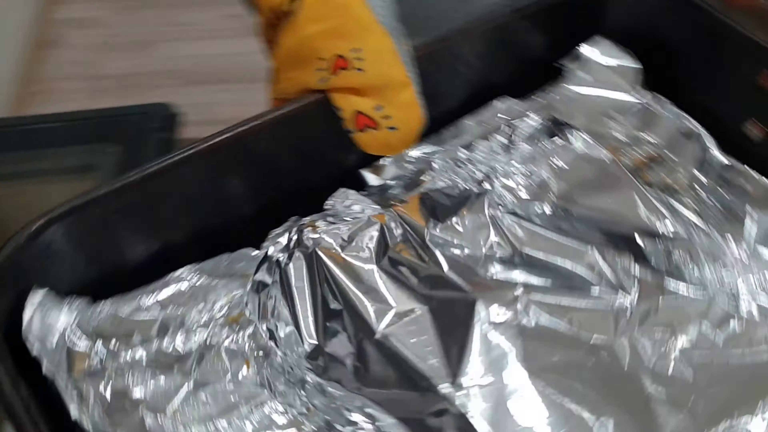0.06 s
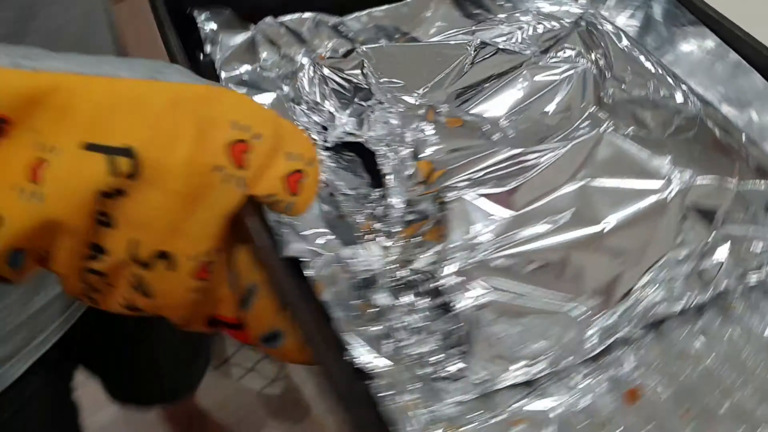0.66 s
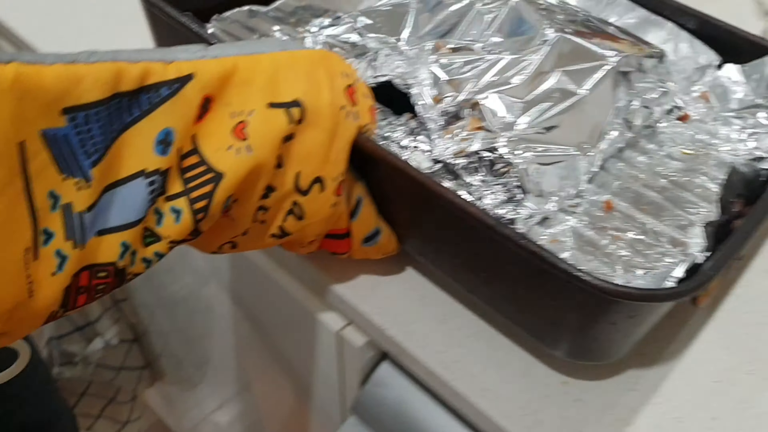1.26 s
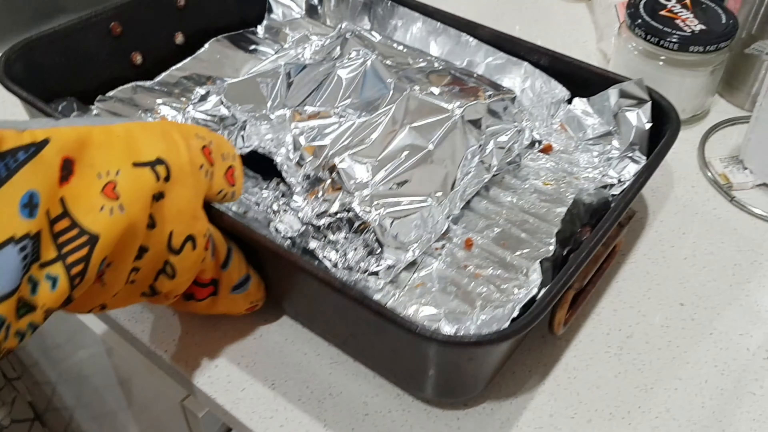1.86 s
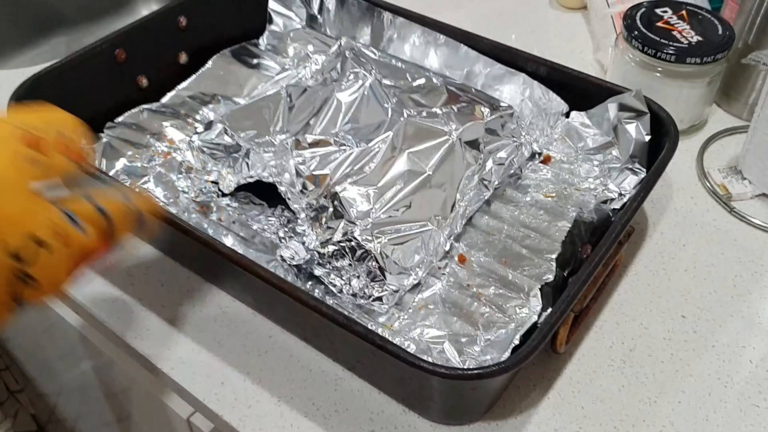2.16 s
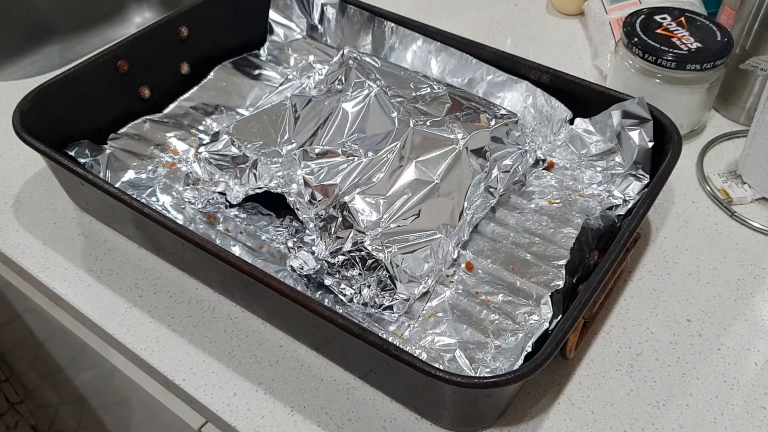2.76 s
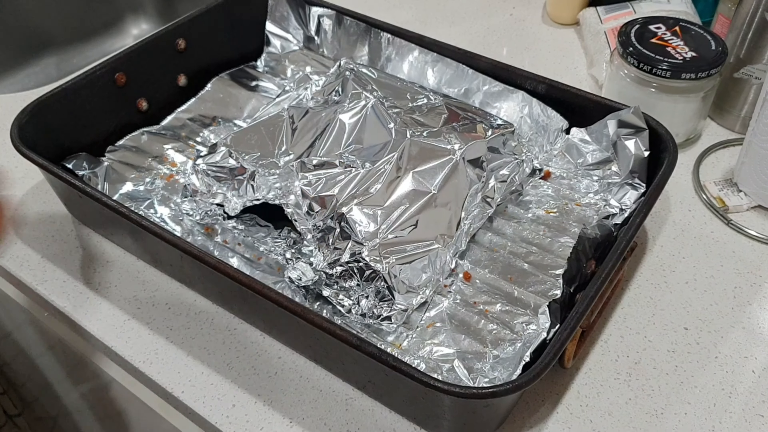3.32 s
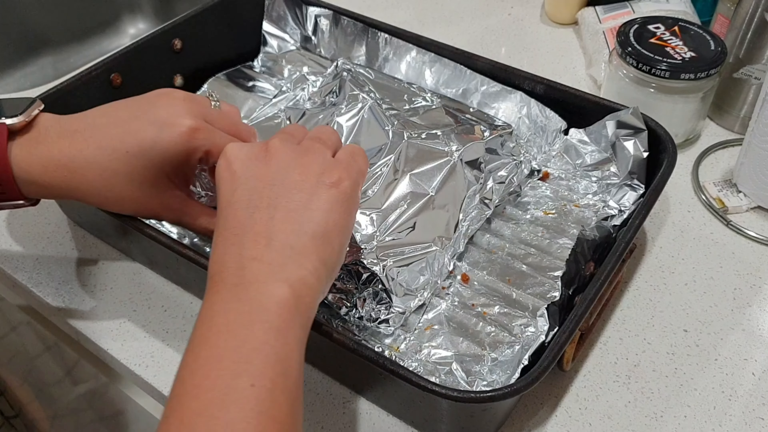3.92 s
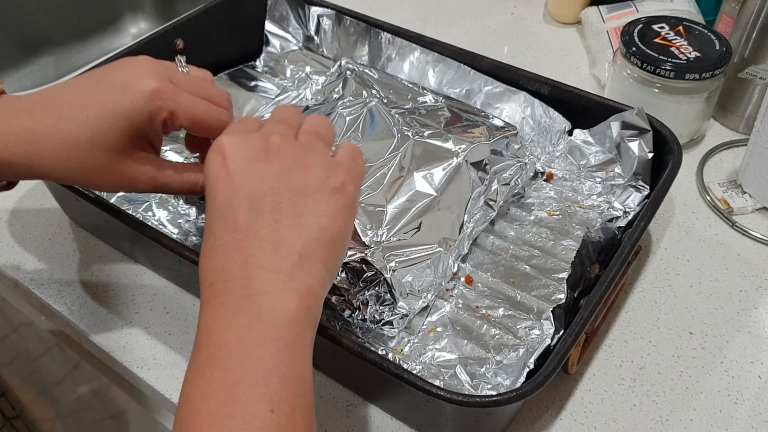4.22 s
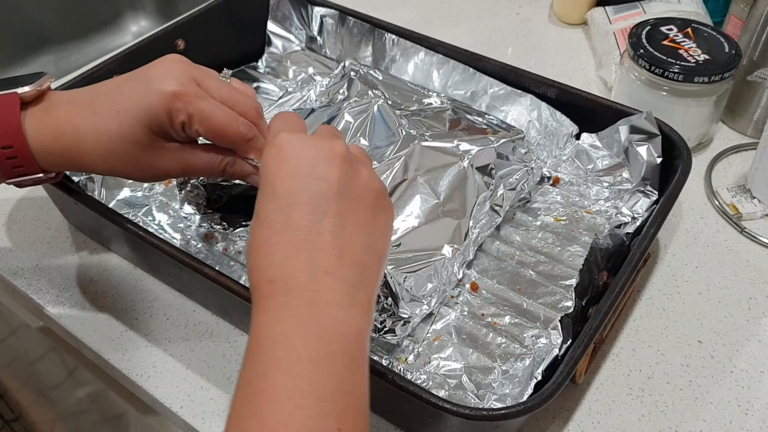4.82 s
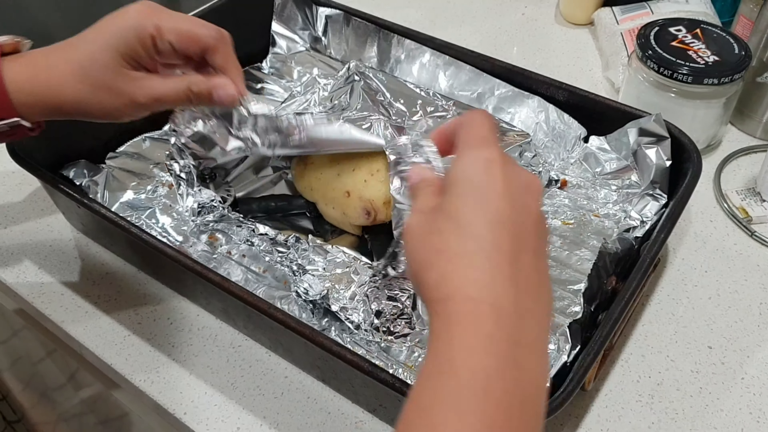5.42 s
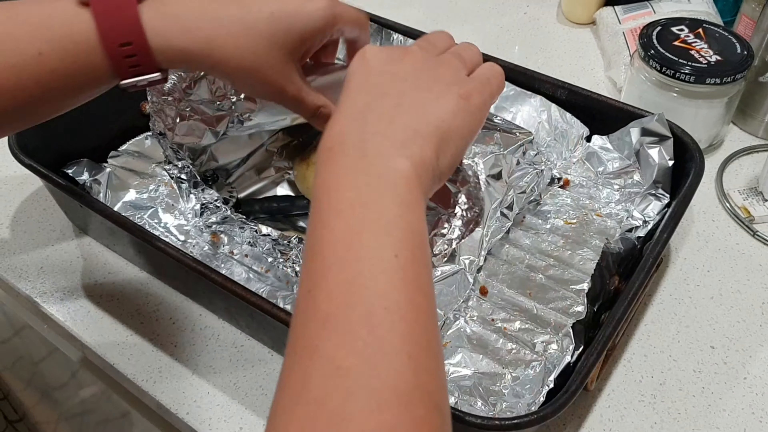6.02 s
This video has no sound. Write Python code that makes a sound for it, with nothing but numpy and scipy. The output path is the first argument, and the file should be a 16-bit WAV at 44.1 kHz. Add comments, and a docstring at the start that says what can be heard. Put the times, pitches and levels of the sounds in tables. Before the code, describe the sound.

A metal roasting pan clanks down on a kitchen counter, then aluminium foil is picked at and peeled back with a bright crinkle.

```python
"""Roasting pan and foil

A hard kitchen that rings for half a second, heard on a close pair of microphones. A foil-lined steel pan
is carried to the counter: one edge lands, then the base, which chatters to rest. After a light tap a
little way off, fingers pick at the aluminium foil and peel it back, its creases flipping in a dense
crinkle. An appliance hums behind it all, and a very thin whine glides by once."""
import sys
import numpy as np
from scipy import signal
from scipy.fft import rfft, irfft, next_fast_len
from scipy.io import wavfile
from scipy.ndimage import uniform_filter1d, map_coordinates

SR = 44100
rng = np.random.default_rng(int(sys.argv[2]) if len(sys.argv) > 2 else 0)


def output_pcm(signal):
    """Save a mono or channel-first signal as 16-bit PCM at the path in sys.argv[1].

    Samples are clipped to [-1, 1] before scaling.
    """
    pcm = np.clip(np.atleast_2d(signal).T, -1, 1) * 32767
    wavfile.write(sys.argv[1], SR, np.round(pcm).astype(np.int16))


N = 272538

# Spectra of the pan's crowd of weaker modes and of flexing foil. Each row: frequency in Hz, level in dB.
STEEL_SPECTRUM = [(45, -26), (130, -11.5), (175, -1), (235, -7.5), (315, -2), (490, -5), (640, -1.5),
                  (1080, -1), (1450, -5), (4400, -10), (5800, -22.5), (7500, -40), (11000, -32),
                  (15500, -26.5)]
FLEX_SPECTRUM = [(80, -8.5), (135, 1), (220, -7), (700, -1.5), (1120, -2), (1400, -5), (3500, -4),
                 (7400, -15.5), (15500, -13.5)]
# Where pan and foil sit between the microphones. Each row: frequency in Hz, left over right in dB.
PAN_BALANCE = [(250, -0.5), (640, -3.5), (1400, -9.5), (3100, -17), (5500, -13.5), (8500, 6),
               (14000, -15.5)]
FLEX_BALANCE = [(180, 13), (550, -1.5), (1650, -4), (5000, -6), (8000, 2.5), (15000, -7)]
# How alike the two microphones hear the room. Each row: frequency in Hz, correlation.
MIC_LIKENESS = [(100, 0.8), (250, 0.84), (500, 0.77), (1000, 0.21), (2500, 0.002)]
# The hands pull the foil back. Each row: start and length in seconds, then level, its change over
# the length and relative sizzle, all in dB.
FOIL_PULLS = [(4.933, 0.12, -52, 2, -4.5), (5.126, 0.13, -53, 16, -1.5), (5.325, 0.09, -50.5, -1.5, -17),
              (5.42, 0.17, -47, 4.5, -4), (5.601, 0.17, -42.5, -1.5, -4), (5.796, 0.042, -46, -1.5, -9),
              (6.14, 0.045, -67.5, 12, -3)]
PULL_ATTACK_S, RUB_RELEASE_DB_PER_S = 0.019, 109.5


def amp(db):
    """Decibels to amplitude."""
    return 10 ** (np.asarray(db) / 20)


def unit(x):
    """Scale to an rms of 1."""
    return x / np.sqrt(np.mean(x ** 2) + 1e-20)


def along(points, hz):
    """Read between (Hz, value) points on a log axis."""
    freqs, values = np.transpose(points)
    return np.interp(np.log(hz + 1), np.log(freqs + 1), values)


def wobble(rate):
    """A smooth random curve, rate knots a second."""
    return map_coordinates(rng.standard_normal(int(N * rate / SR) + 4), [np.arange(N) * rate / SR])


def add(track, s, sound):
    """Mix a sound into the stereo track at s seconds."""
    part = track[:, round(s * SR):][:, :sound.shape[1]]
    part += sound[:, :part.shape[1]]


def colour(x, points, size=8192):
    """Causal filter with the gain of the (Hz, dB) points."""
    cepstrum = irfft(np.log(amp(along(points, np.fft.rfftfreq(size, 1 / SR)))))
    cepstrum[1:size // 2] *= 2
    cepstrum[size // 2 + 1:] = 0
    kernel = irfft(np.exp(rfft(cepstrum)))
    return signal.oaconvolve(x, kernel[None], axes=1)[:, :x.shape[1]]


def diffuse(n):
    """Stereo noise as two close microphones hear it: alike in the bass, unrelated in the treble."""
    m = next_fast_len(n)
    turn = np.arccos(np.clip(along(MIC_LIKENESS, np.fft.rfftfreq(m, 1 / SR)), -1, 1)) / 2
    mid, side = irfft(rfft(rng.standard_normal((2, m))) * [np.cos(turn), np.sin(turn)], m)[:, :n]
    return np.array([mid + side, mid - side])


def place(x, balance):
    """Share each frequency between the microphones by its left-over-right dB."""
    m = next_fast_len(N + SR // 10)
    ratio = amp(along(balance, np.fft.rfftfreq(m, 1 / SR)))
    gains = np.array([ratio, np.ones_like(ratio)]) * np.sqrt(2 / (1 + ratio ** 2))
    return irfft(rfft(x, m) * gains, m)[:, :N]


def burst(spectrum, t60):
    """Countless close modes struck at once: coloured noise that falls 60 dB in t60 seconds."""
    t = np.arange(int(SR * (t60 + .02))) / SR
    return unit(colour(diffuse(len(t)), spectrum)) * amp(-60 * t / t60)


def crackle(rate, t60, patchy_db, spread_db=0, size=256):
    """Tiny random clicks, rate a second, each with its own pitches; spread_db makes a few stand out."""
    chance, strength = rng.random(N), np.minimum(rng.exponential(size=N), 4)
    clicks = (chance < rate / SR) * amp(spread_db * strength)
    energy = signal.lfilter([1], [1, -amp(-120 / (t60 * SR))], clicks ** 2)
    spectra = signal.stft(diffuse(N), nperseg=size)[2]
    patches = uniform_filter1d(rng.standard_normal(spectra.shape[1:]), size=2, axis=0)
    patches = unit(uniform_filter1d(patches, size=5, axis=1))
    ringing = signal.istft(spectra * amp(patchy_db * patches), nperseg=size)[1][:, :N]
    return unit(np.sqrt(energy) * ringing)


def strokes(rows, attack_s, release_db_per_s):
    """Gain of (start s, length s, dB, change dB) movements: each rises, swells or sags, then dies."""
    power = np.zeros(N)
    for s, length, db, change_db, *_ in rows:
        t = np.arange(N) / SR - s
        held_db = db + change_db * np.clip(t / length, 0, 1)
        fallen_db = release_db_per_s * np.maximum(t - length, 0)
        power += (np.clip(t / attack_s, 0, 1) * amp(held_db - fallen_db)) ** 2
    return np.sqrt(power)


def pan():
    """Each contact rings the steel: an edge clanks, a flat landing thuds more and is brighter."""
    # Each row: time in seconds, level in dB, flatness from 0 (on an edge) to 1 (on the whole base).
    landings = [(1.2294, -20.5, 0.02), (1.2389, -25, 0.13), (1.2548, -23.5, 0.51), (1.3259, -25, 0.17),
                (1.339, -23, 0.29), (1.3688, -24.5, 0.098), (2.0175, -16, 0.5), (2.033, -21.5, 1),
                (2.051, -20.5, 1), (2.081, -26.5, 0.82)]
    out = np.zeros((2, N))
    for s, db, flat in landings:
        thud_db, clank_db = -8.5 * (1 - flat), 1.5 * (1 - flat)
        bright_db = -7 + 11.5 * flat
        tone = [(450, thud_db), (700, 0), (1150, clank_db), (1700, bright_db)]
        add(out, s, amp(db + 1.5) * colour(burst(STEEL_SPECTRUM, t60=0.19), tone))
        add(out, s, amp(db - 0.76) * pan_ring(flat))
    return place(kitchen(out, wet_db=-7.5), PAN_BALANCE)


def pan_ring(flat, scatter_db=1.5, beat_hz=13, beat_depth=0.63):
    """The pan's strongest modes, with new strengths each blow; each is a close pair that beats."""
    # Each row: frequency in Hz, level in dB on an edge, level in dB on the base, t60 in seconds.
    steel_modes = [(185.6, -15, -8.5, .17), (301, -21.5, -11, 0.21), (363, -27, -14, 0.27),
                   (437.5, -26, -14.5, .3), (626.6, -6.5, -12.5, 0.23), (784, -7, -15.5, 0.31),
                   (850, -18, -15, 0.28), (901, -13, -28, .62), (1088, -7, -14, 0.33),
                   (1133, -28.5, -16.5, .72), (1230, -10.5, -18, .22), (1265, -7.5, -18, 0.18),
                   (1610, -24, -17, .36), (1760, -21, -12, .32), (2070, -17, -14, .33),
                   (2250, -20, -12, 0.41), (2702, -14, -24, .2), (2890, -26, -14, .35),
                   (4220, -16, -14, .13)]
    t = np.arange(SR * 3 // 4) / SR
    hz, edge_db, base_db, t60 = np.transpose(steel_modes)
    gain = amp(edge_db + flat * (base_db - edge_db) + scatter_db * rng.standard_normal((2, len(hz))))
    phase = 2 * np.pi * rng.random(len(hz))
    mic_shift = np.outer([1, -1], rng.standard_normal(len(hz)) * (1 - along(MIC_LIKENESS, hz)))
    pace, start = rng.random((2, len(hz), 1))
    beats = 1 + beat_depth * np.cos(2 * np.pi * (beat_hz * (.5 + pace) * t + start))
    waves = beats * np.exp(np.outer(2j * np.pi * hz - np.log(1000) / t60, t))
    attack = 1 - np.exp(-t / 0.00066)
    return ((gain * np.exp(1j * (phase + mic_shift))) @ waves).imag * attack


def chatter():
    """Rapid small contacts buzz in the steel, close by, and stop at once when the pan settles."""
    # Judder on the edge, slide, chatter on the base.
    # Each row: start and length in seconds, level and its change in dB.
    rattles = [(1.35, 0.62, -33, -38), (1.93, 0.1, -66, 10.5), (2.07, 0.2, -22.5, -14.5)]
    steel = colour(crackle(rate=550, t60=0.13, patchy_db=2), STEEL_SPECTRUM)
    buzz = unit(colour(steel, [(400, -3), (2000, 5), (4500, 2), (12000, 0.5)]))
    out = strokes(rattles, attack_s=0.016, release_db_per_s=2500.5) * buzz
    return place(kitchen(out, wet_db=-21.5), PAN_BALANCE)


def peeling():
    """Each pull flips a mass of small creases; the finest sizzle briefly, larger ones go on settling."""
    # The bright crinkle. Each row: frequency in Hz, level in dB.
    spectrum = [(700, -30), (1400, -11), (3100, 0), (4400, 1), (5600, -7), (7600, -26.5), (13500, -11),
                (15500, -12)]
    # Each row: frequency in Hz, left over right in dB.
    balance = [(1000, -23), (4000, -23), (5500, -14), (7500, 2), (9500, 7), (15000, -19)]
    # Single creases spring open as the sheet lifts. Each row: time in seconds, level in dB.
    creases = [(5.1294, -24), (5.141, -29), (5.152, -33), (5.1847, -34), (5.2123, -30), (5.352, -22),
               (5.5583, -23), (5.6245, -23), (5.6765, -16), (5.7225, -19), (5.761, -22), (5.815, -23)]
    grains = unit(colour(crackle(rate=1700, t60=0.025, patchy_db=2.5, spread_db=2.5), spectrum))
    finest = colour(grains, [(6500, -37), (9000, 3)])
    coarse = colour(grains, [(7500, 1), (10000, -24)])
    crinkle = strokes(FOIL_PULLS, PULL_ATTACK_S, release_db_per_s=103)
    sizzle_rows = [(s, length, db + sizzle_db + change_db / 2, change_db / 2)
                   for s, length, db, change_db, sizzle_db in FOIL_PULLS]
    sizzle = strokes(sizzle_rows, PULL_ATTACK_S, release_db_per_s=172)
    out = amp(1.5) * crinkle * coarse + amp(6.5) * sizzle * finest
    for s, db in creases:
        add(out, s, amp(db - 16.5) * burst(spectrum, t60=0.027))
    return place(kitchen(out, wet_db=-6.5), balance)


def bending():
    """Each pull bends the whole sheet, which crumples dully under the bright crinkle."""
    pull = strokes(FOIL_PULLS, PULL_ATTACK_S, release_db_per_s=151)
    folds = unit(colour(crackle(rate=1300, t60=0.016, patchy_db=1.5), FLEX_SPECTRUM))
    return place(kitchen(amp(-2) * pull * folds, wet_db=-7.5), FLEX_BALANCE)


def fingers():
    """Pinched foil buckles in dull snaps over a soft crumpling, knocking the pan hollowly."""
    # The foil's edge is pinched up. Each row: start and length in seconds, level and its change in dB.
    pinches = [(3.845, 0.043, -57, 0.5), (3.972, 0.095, -59.5, 5), (4.215, 0.055, -49, -2),
               (4.42, 0.094, -55.5, 1.5), (4.595, 0.053, -57, 1.5), (4.74, 0.038, -51, -4.5),
               (4.9, 0.032, -51.5, -2)]
    # Single folds buckle. Each row: time in seconds, snap level in dB, knock level in dB.
    snaps = [(3.9733, -55, -51), (4.2206, -35, -62), (4.232, -36.5, -43.5), (4.262, -39, -46.5),
             (4.423, -40, -56), (4.597, -32, -58), (4.605, -40, -53), (4.751, -44, -55), (4.91, -45, -51),
             (4.939, -50, -45.5)]
    # The lined pan under a fingertip. Each row: frequency in Hz, level in dB.
    knock_spectrum = [(150, -12), (330, 0), (1050, 3.5), (2000, -15.5)]
    grip = (3.83, 1.13, -66, 7)  # the held foil crackles on between pinches
    pressure = strokes(pinches + [grip], attack_s=0.013, release_db_per_s=195)
    folds = unit(colour(crackle(rate=1100, t60=0.073, patchy_db=4), FLEX_SPECTRUM))
    out = amp(2) * pressure * folds
    for s, db, knock_db in snaps:
        add(out, s, amp(db - 7) * burst(FLEX_SPECTRUM, t60=0.094))
        add(out, s, amp(knock_db) * burst(knock_spectrum, t60=0.089))
    return place(kitchen(out, wet_db=-9), FLEX_BALANCE)


def tap():
    """Something light is put down a little way off, mostly heard through the room, and rings faintly."""
    # Each row: time in seconds, level in dB.
    contacts = [(2.78, -72.5), (3.1111, -51.5), (3.1151, -45.5), (3.1219, -43.5)]
    # Each row: frequency in Hz, level in dB.
    contact_spectrum = [(200, -11), (470, -8.5), (650, -8), (1100, -4.5), (1800, 0.5), (2700, -14.5),
                        (4500, -3), (7500, -28.5), (14000, -21)]
    # The last contact rings on. Each row: frequency in Hz, level in dB, t60 in seconds.
    modes = [(474, -13, 0.39), (1032, -21.5, 0.54)]
    out, t = np.zeros((2, N)), np.arange(SR // 2) / SR
    for s, db in contacts:
        add(out, s, amp(db) * burst(contact_spectrum, t60=0.046))
    out = kitchen(out, wet_db=4)
    last_s, last_db = contacts[-1]
    ring = sum(amp(db - 60 * t / t60) * np.sin(2 * np.pi * hz * t) for hz, db, t60 in modes)
    add(out, last_s, amp(last_db + 1.5) * ring[None])
    return place(out, FLEX_BALANCE)


def brushing():
    """Faint brushes as the pan is carried, as it slides just before landing, and as the hands return."""
    # Each row: start and length in seconds, level and its change in dB.
    brushes = [(1.025, .2, -83.5, -3.5), (1.96, .05, -63, 4.5), (3.35, 0.27, -75.5, -10.5)]
    # Each row: frequency in Hz, level in dB.
    spectrum = [(400, -5.5), (900, 1.5), (3300, 3.5), (5000, 4), (6500, -20.5)]
    touch = strokes(brushes, attack_s=0.0067, release_db_per_s=RUB_RELEASE_DB_PER_S)
    grains = unit(colour(crackle(rate=360, t60=0.011, patchy_db=6.5, spread_db=2.5), spectrum))
    return place(kitchen(touch * grains, wet_db=1), PAN_BALANCE)


def scrape(band_ratio=2.1, attack_s=0.018):
    """Faint, narrow scuffs as the gloved hand carries the pan and lets go of it."""
    # Each row: start and length in seconds, level in dB, band centre in Hz.
    scuffs = [(0.384, 0.13, -77, 3000), (1.02, 0.24, -77, 3380), (2.467, 0.16, -76.5, 2104),
              (2.596, 0.22, -84, 4700)]
    out = np.zeros((2, N))
    for s, length, db, hz in scuffs:
        band = [(hz / band_ratio, -30), (hz, 0), (hz * band_ratio, -30)]
        touch = strokes([(s, length, db, 0)], attack_s, RUB_RELEASE_DB_PER_S)
        out += touch * unit(colour(diffuse(N), band))
    return place(out, PAN_BALANCE)


def kitchen(x, wet_db, size=256):
    """Add the hard room's answer; each frequency dies at its own speed."""
    # Each row: frequency in Hz, t60 in seconds.
    reverb_times = [(100, 0.73), (500, 0.6), (2000, 0.64), (7000, 0.55), (14000, 0.53)]
    hz, t, spectra = signal.stft(diffuse(SR * 3 // 4), SR, nperseg=size)
    decay = amp(-60 * t / along(reverb_times, hz)[:, None])
    tail = signal.istft(spectra * decay, SR, nperseg=size)[1]
    tail *= 1 - np.exp(-np.arange(tail.shape[1]) / SR / 0.0025)
    return x + amp(wet_db) * signal.fftconvolve(x, tail / np.linalg.norm(tail[0]), axes=1)[:, :N]


def room_tone():
    """Appliance hum, rumble and hiss dip as the recorder turns down after the landing, then return."""
    # The hum's tones and the two noise spectra. Each row: frequency in Hz, level in dB.
    hum_tones = [(33, -62), (102.3, -66.5), (199.2, -71.5)]
    rumble_spectrum = [(30, -2.5), (60, -14), (110, -0.5), (200, -10.5), (330, -18), (600, -40),
                       (1300, -92.5)]
    hiss_spectrum = [(800, -3.5), (2500, -3.5), (6500, -11.5), (15000, -10)]
    # Each row: time in seconds, gain in dB; the hiss follows about half as far.
    recorder_gain = [(0, 2.5), (2.2, 1.5), (2.6, -4), (3.3, -4), (3.7, 1), (4.8, 1), (6.18, -4)]
    t = np.arange(N) / SR
    gain_db = np.interp(t, *np.transpose(recorder_gain))
    hum = sum(amp(db + 2 + wobble(2.2)) * np.sin(2 * np.pi * hz * t + 0.84 * wobble(9.1))
              for hz, db in hum_tones)
    rumble = amp(-65) * unit(colour(diffuse(N), rumble_spectrum))
    hiss = amp(-78 + 0.52 * gain_db) * unit(colour(diffuse(N), hiss_spectrum))
    return place(amp(gain_db) * (hum + rumble), [(30, 7), (120, 0.5)]) + hiss


def whine(low_hz=11000):
    """A very faint, fuzzy tone arches up past the recorder's range and back, fading at both ends."""
    # Each row: start and length in seconds, top pitch in Hz, level in dB, pitch jitter in Hz.
    glides = [(1.08, 0.68, 20000, -71, 320)]
    out = np.zeros((2, N))
    for s, length, top_hz, db, fuzz_hz in glides:
        arch = np.sin(np.linspace(0, np.pi, int(length * SR))).clip(0) ** 0.7
        hz = low_hz + (top_hz - low_hz) * arch + fuzz_hz * wobble(2500)[:len(arch)]
        add(out, s, amp(db) * np.sqrt(2 * arch) * np.sin(2 * np.pi * np.cumsum(hz) / SR)[None])
    return out


def scene():
    """The counter and the room behind it."""
    counter = pan() + chatter() + tap() + fingers() + bending() + peeling() + brushing() + scrape()
    return counter + room_tone() + whine()


def record(dry, limit_hz=15600):
    """The recorder keeps nothing above its band limit."""
    m = next_fast_len(N + SR // 2)
    hz = np.fft.rfftfreq(m, 1 / SR)
    return irfft(rfft(dry, m) / (1 + (hz / limit_hz) ** 500), m)[:, :N]


dry = scene()
out = record(dry)
output_pcm(out)
```